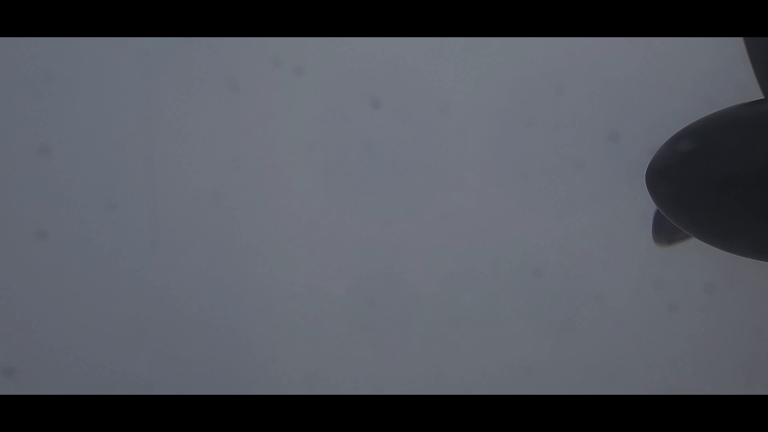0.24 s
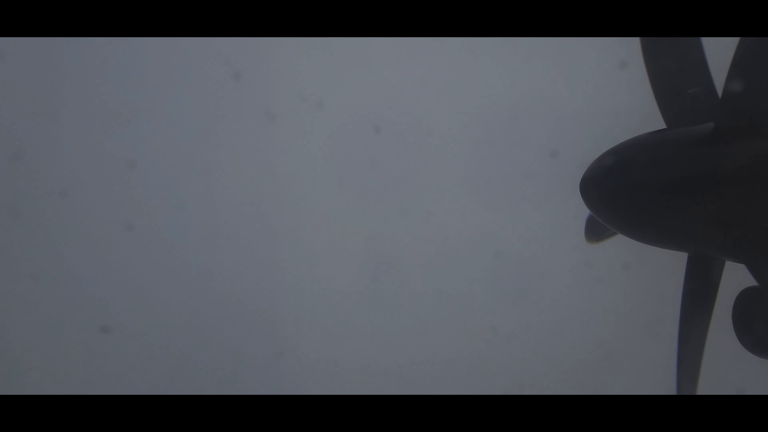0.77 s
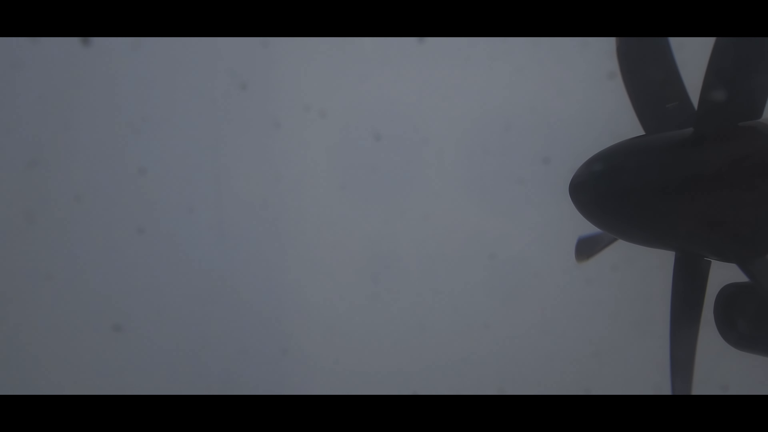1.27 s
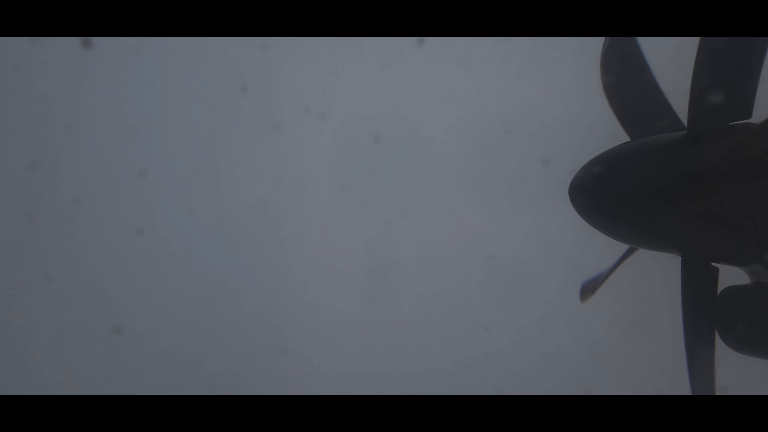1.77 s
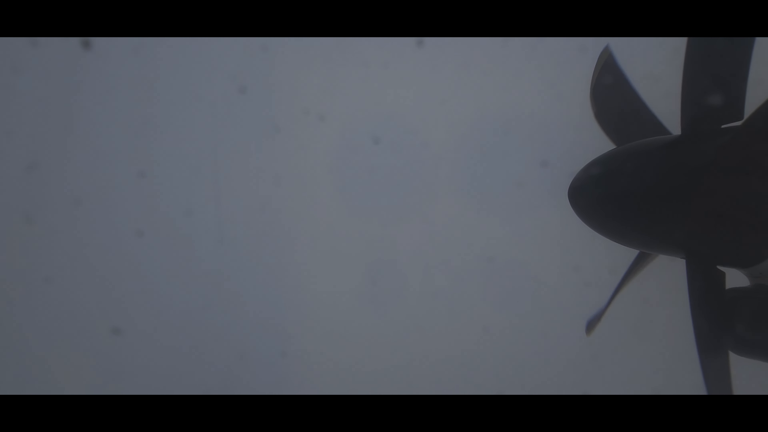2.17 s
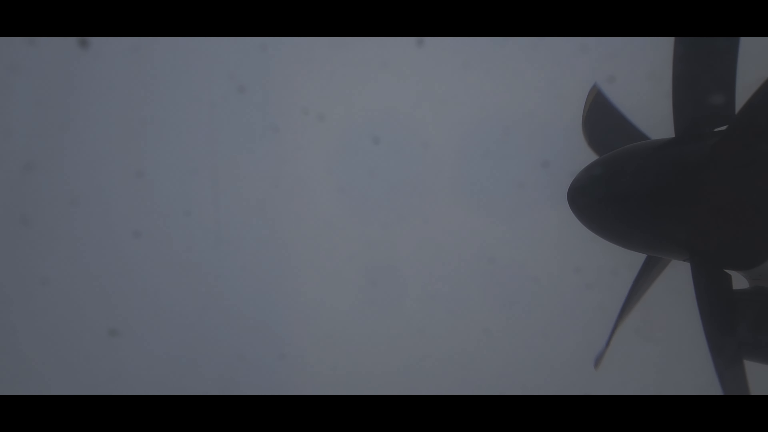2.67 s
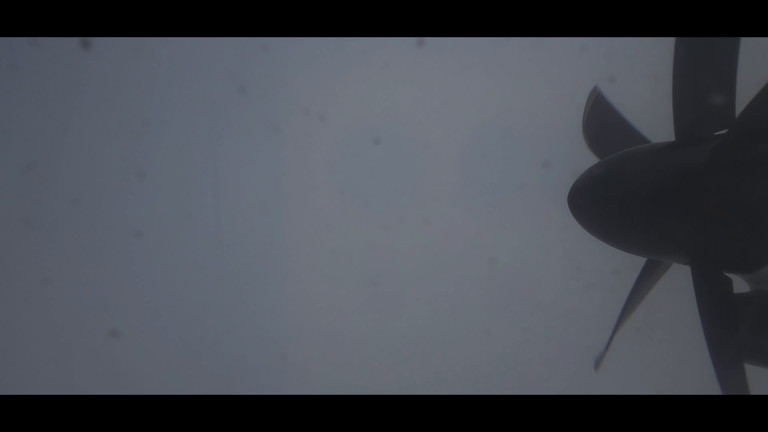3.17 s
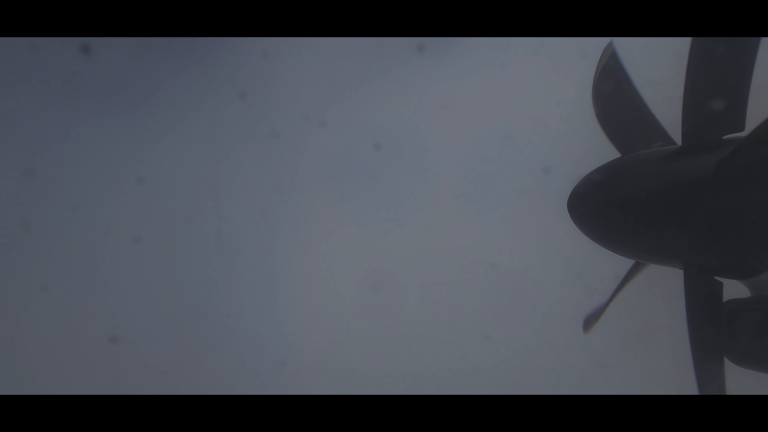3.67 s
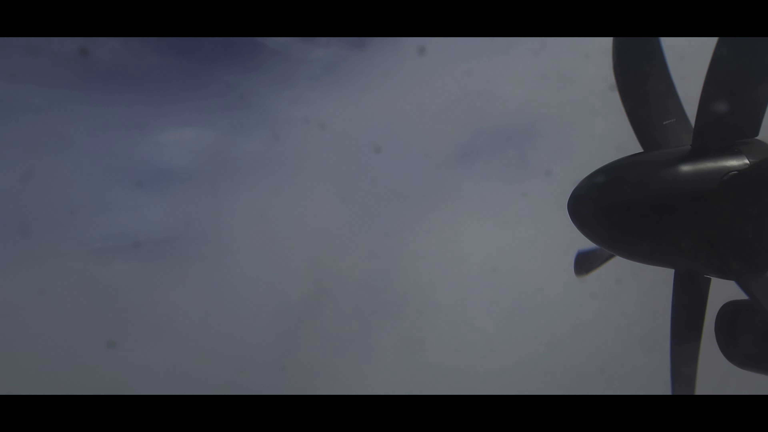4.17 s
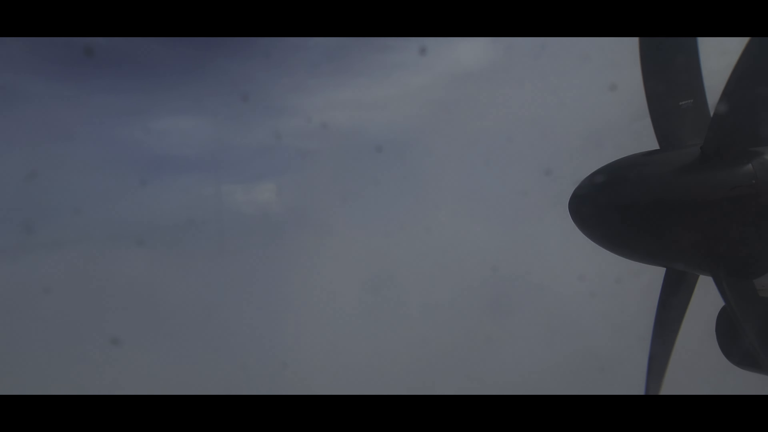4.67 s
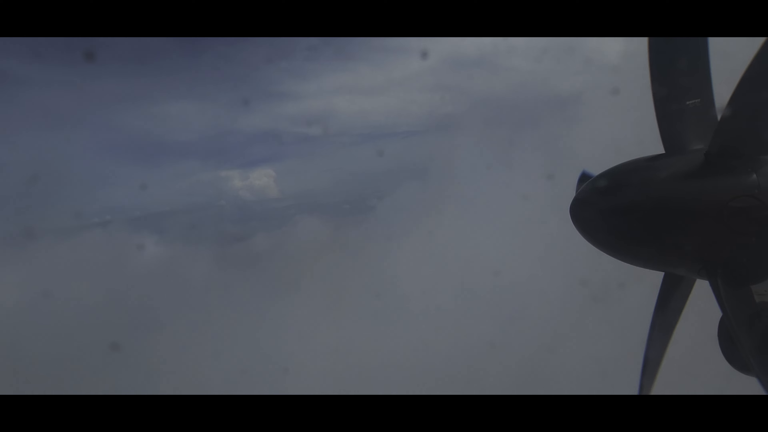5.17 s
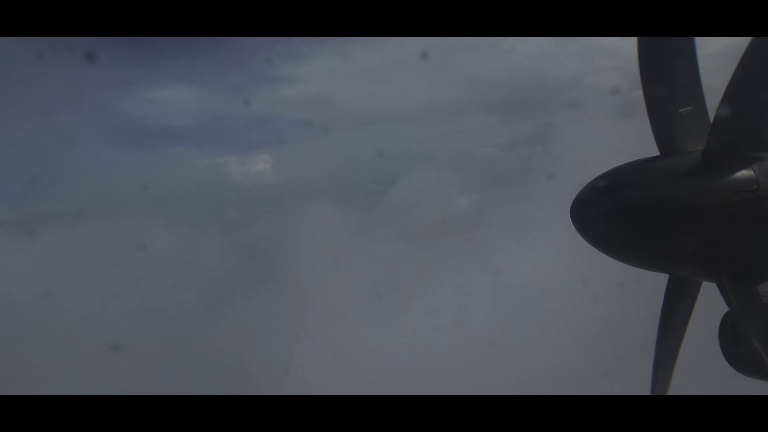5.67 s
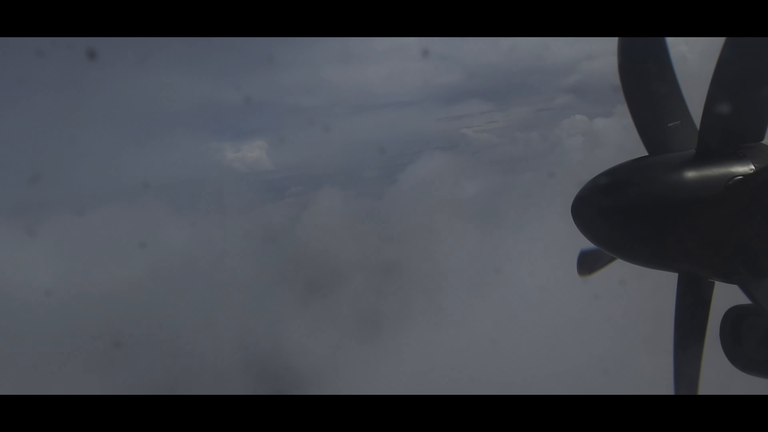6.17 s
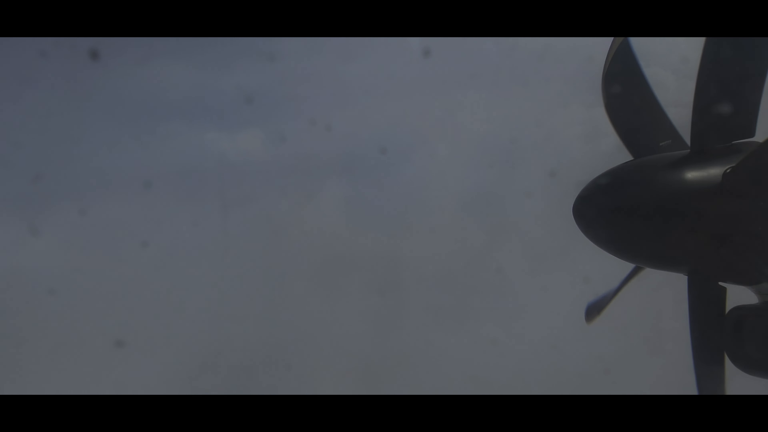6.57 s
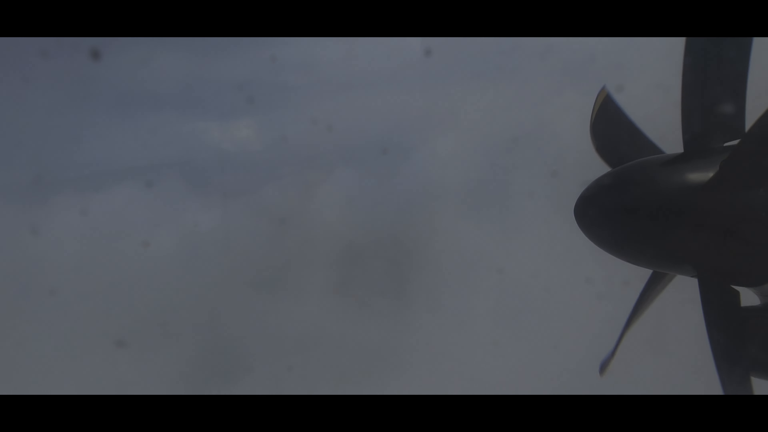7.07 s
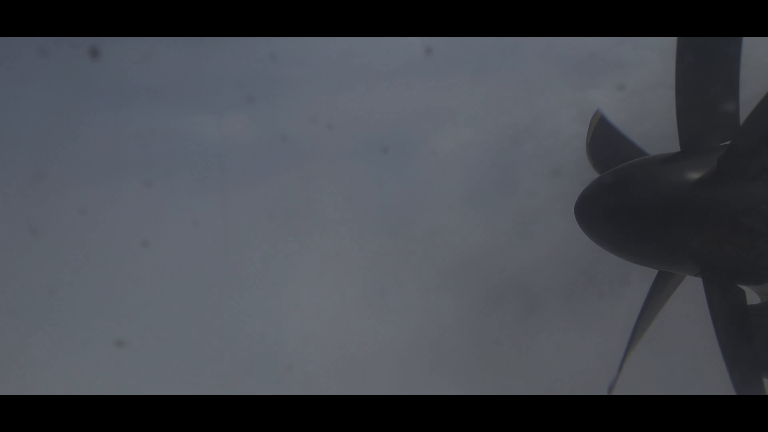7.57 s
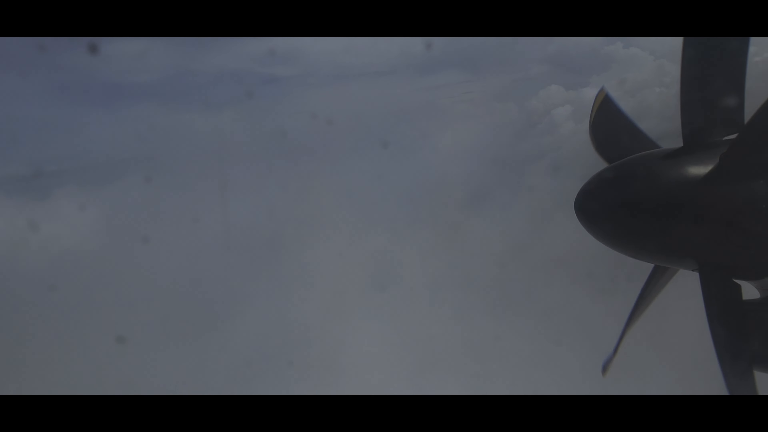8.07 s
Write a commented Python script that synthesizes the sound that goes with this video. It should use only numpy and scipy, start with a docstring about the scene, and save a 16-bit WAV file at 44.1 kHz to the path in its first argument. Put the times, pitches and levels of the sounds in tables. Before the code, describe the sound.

A deep, steady propeller drone fills a small aircraft cabin, slowly swelling and sinking as two propellers drift in and out of step. Airframe rumble and air hiss run throughout. A loose trim panel buzzes in bouts, with dry slaps in the first couple of seconds; the hum thins near three seconds, then returns full. A thin high whine sits on top. Microphone close by at a window seat, in stereo.

```python
"""A deep blade-pass hum swells and sinks in a turboprop cabin, over a rumbling, roaring airframe.
Two six-bladed propellers make it: each harmonic is a pair of tones that add or cancel as their lag drifts.
Airframe rumble and roar are shaped noise, the roar pulsing with the blades; shaped noise also hisses steadily.
A loose trim panel buzzes and rings once per blade pass, harder in bouts, with a few sharp slaps.
A thin turbine whine of unsteady tones sits on top."""
import sys
import numpy as np
from scipy import signal
from scipy.fft import rfft, irfft, next_fast_len
from scipy.io import wavfile
from scipy.ndimage import map_coordinates

SR = 44100
rng = np.random.default_rng(int(sys.argv[2]) if len(sys.argv) > 2 else 0)


def to_wav(sig):
    """Store sig (one row per channel, or 1-D mono) as 16-bit WAV at the path in sys.argv[1].

    Samples outside -1..1 are clipped; the rate is SR.
    """
    pcm = np.clip(np.atleast_2d(sig), -1, 1) * 32767
    pcm = np.round(pcm).astype(np.int16)
    wavfile.write(sys.argv[1], SR, pcm.T)  # frames by channels


N = 367345  # length in samples

# Blades passing the window. Each row: time in seconds, rate in Hz.
BLADE_RATE = [(0, 90.05), (0.8, 90.5), (1.4, 89.94), (1.9, 90.23), (2.4, 90.25), (2.9, 90.1), (3.4, 89.9),
              (3.9, 89.8), (4.4, 89.85), (4.9, 89.66), (5.4, 90.65), (5.9, 90.66), (6.5, 90.52),
              (7.1, 90.34), (7.7, 90.17), (8.33, 89.57)]
# How far the other propeller trails the near one. Each row: time in seconds, lag in blade passes.
PROPELLER_LAG = [(0, 0.074), (.95, 0.12), (1.5, 0.11), (2, 0.081), (2.6, 0.17), (3, 0.31), (3.25, 0.39),
                 (3.6, 0.3), (4, 0.14), (4.33, 0.0098), (4.7, 0.098), (5.1, 0.14), (5.55, 0.206),
                 (6.2, 0.17), (6.7, 0.047), (7.2, 0.19), (7.7, 0.29), (8.33, 0.25)]
# Blade-pass harmonics from the first up, before balance and loading. Each row: near propeller in dB,
# other propeller's share (0-1), lag at which the two add up in blade passes, left-right phase in rad,
# flutter depth (0-1).
HARMONICS = [(-21, 1, 0.0041, 0.1, 0), (-29.5, 0.48, .28, 0.32, .04), (-29.5, 0.41, 0.269, 0.4, 0.06),
             (-30, 0.07, 0.25, 0.25, 0.16), (-44, 0.07, 0.113, 1.66, 0.37), (-47, 0.59, 0.144, -1, 0.4),
             (-52, 0.4, 0.127, 1.3, 0.37), (-52, 0.26, 0.082, 2.2, 0.2), (-49.5, 0.9, 0.014, 2.6, 0.26),
             (-62, .4, 0.076, 2.7, 0.3)]
# Gain on the thin harmonics. Each row: time in seconds, fifth in dB, sixth in dB, seventh and above in dB.
OVERTONE_GAIN = [(0, -7, -4, -2), (1.1, -2, -2.5, -1), (1.8, -8, -2, -1), (2.7, -4, -1.5, -3),
                 (4, -2, 2.5, 1), (4.8, 4, 2, 1), (5.3, -6, -2, 3), (5.6, -1, -0.5, 8), (6.5, 0, 1.5, -1),
                 (7.4, -1.5, -2, 0), (8.33, 2, 0, 1)]
# Turbulent flow on the airframe, before trim. Each row: time in seconds, rumble in dB, roar in dB.
FLOW = [(0, -34, -34), (0.5, -34.5, -36), (1, -34.5, -35), (1.9, -35.5, -35.5), (2.7, -34, -35.5),
        (3, -33, -36), (3.25, -24.5, -32.5), (3.55, -31.5, -33), (4.1, -31.5, -33), (4.9, -34.5, -35.5),
        (5.5, -32, -35.5), (6.4, -32.5, -36), (7.3, -33.5, -34), (7.8, -29.5, -35.5), (8.33, -32, -32)]

# Noise colours, only their shape matters. Each row: frequency in Hz, relative density in dB per Hz.
RUMBLE_COLOUR = [(18, -35), (41, -10), (46, -2), (54, 1.5), (63, -1), (72, -0.5), (85, -3.5), (115, -6),
                 (150, -8), (195, -12.5), (235, -6.5), (290, -7.5), (340, -26.5), (420, -20.5),
                 (700, -53.5)]
ROAR_COLOUR = [(120, -14), (260, 4), (400, 2), (445, -7), (520, -4), (610, -8), (740, -10), (820, -7),
               (950, -18), (1250, -16), (1600, -22), (2500, -27), (5000, -72)]
HISS_LEFT_COLOUR = [(900, -6), (2000, -13.5), (2600, -17.5), (3000, -7), (4100, -13), (5600, -6),
                    (7000, -8), (7700, 1.5), (8200, -5.5), (9600, -6.5), (10700, -23), (11500, -13),
                    (14000, -16.5), (15500, -15)]
HISS_RIGHT_COLOUR = [(900, -30), (2000, -10.5), (2600, -14), (3100, -8), (4100, -8), (6200, -6.5),
                     (7100, -11), (7700, -18), (8300, -13), (9300, -16), (10700, -13.5), (11500, -13.5),
                     (12500, -22), (15500, -27)]
BUZZ_COLOUR = [(300, -5), (600, 10), (950, 1), (1500, -2), (1900, -10), (2600, -5.5), (3000, -1),
               (4300, -1), (6400, 1.5), (8000, -4.5), (10000, -5), (12400, -4.5), (14200, -10.5),
               (15500, -6)]
# Stereo width of the airframe noise. Each row: frequency in Hz, left-right likeness (0-1).
LIKENESS = [(40, 0.9), (130, 0.92), (260, 0.18), (400, 0.9), (520, 0.83), (700, 0), (1200, 0.28), (3000, 0)]

# Turbine whine and its sidebands a blade rate apart. Each row: frequency in Hz, level in dB before trim.
WHINE = [(7307, -61), (7487, -67), (7578, -60), (7668, -53), (7758, -56), (7848, -61), (7938, -64),
         (8028, -66), (8119, -67), (8570, -65)]
# The panel's hardest slaps. Each row: time in seconds, burst level in dB before colouring.
SLAPS = [(0.6793, -24), (0.6994, -33), (0.711, -24), (0.8454, -28), (0.899, -27), (1.6192, -30),
         (1.708, -29), (1.8297, -29), (1.886, -27), (1.94, -27), (2.2297, -27), (2.2976, -29)]
# The panel's ringing modes. Each row: frequency in Hz, relative level in dB, time to fall 60 dB in seconds.
PANEL_MODES = [(765, 3, 0.06), (1020, 12, 0.022), (1120, -6.5, 0.012), (1370, 5, 0.016), (1430, -3, 0.028)]
# Bouts of harder buzzing, before trim. Each row: start in seconds, length in seconds, rise in seconds,
# buzz in dB, hollow ring in dB.
BOUTS = [(0, 0.66, 0.092, -42, -55.5), (0.648, 0.074, .03, -35.5, -48), (0.812, 0.11, 0.036, -36.5, -64),
         (.95, 0.55, 0.038, -47, -59), (1.54, 0.15, .06, -40, -71), (1.872, 0.048, .02, -37, -65),
         (2.16, 0.19, 0.044, -40.5, -58), (3.183, 1.78, 0.74, -37.5, -49.5), (4.95, .27, 0.049, -40, -49.5),
         (5.41, .3, 0.048, -49, -53.5), (5.962, 0.84, 0.022, -37, -48), (6.878, 0.86, .06, -47, -56)]
# Peaks and hollows of the microphone ports. Each row: frequency in Hz, width in Hz, gain in dB.
PORTS = [(2590, 56, -8), (4310, 150, 2), (4735, 310, 3), (5120, 120, -1), (5460, 86, 3.5),
         (10750, 230, -7.5), (11500, 170, -1), (12100, 210, -7), (12550, 130, 2.5), (13600, 240, -10),
         (13900, 170, 0), (15400, 220, -15)]

BLADES = 6
GUST_LOADING = 0.2  # dB that the second to fourth harmonics gain per dB of rumble, as gusts load the blades
IDLE_BUZZ_DB, IDLE_RING_DB = -44.5, -60.5  # the panel between bouts, before trim
RELEASE_S = 0.02  # decay time constant of a bout
TOP_HZ, EDGE_S = 15650, 0.006  # band limit; fade at each end


def amp(db):
    """Decibels to gain."""
    return 10 ** (np.asarray(db) / 20)


def unit(x):
    """Scaled to rms 1."""
    return x / np.sqrt(np.mean(x ** 2) + 1e-20)


def along(points, hz):
    """(Hz, value) points read on a log frequency axis."""
    f, v = np.transpose(points)
    return np.interp(np.log(hz + 1), np.log(f + 1), v)


def curves(rows):
    """One value per sample for each column after the time."""
    s, *cols = np.transpose(rows)
    return [np.interp(np.arange(N) / SR, s, c) for c in cols]


def wobble(rate):
    """A smooth random curve with rate knots a second."""
    t = np.arange(N) / SR
    coarse = t[::64]
    knots = rng.standard_normal(1024)
    return np.interp(t, coarse, map_coordinates(knots, [coarse * rate], mode="mirror"))


def filtered(x, response):
    """x times a response of frequency, padded against wrap-around."""
    m = next_fast_len(N + SR // 2)
    return irfft(rfft(x, m) * response(np.fft.rfftfreq(m, 1 / SR)), m)[..., :N]


def coloured(x, spectrum):
    """x shaped by (Hz, dB) points."""
    return filtered(x, lambda hz: amp(along(spectrum, hz)))


def lean(left_db):
    """Gains that make the left channel louder by left_db."""
    return amp(left_db * np.array([[0.5], [-0.5]]))


def rush(spectrum):
    """Stereo noise of rms 1, its left-right likeness set per frequency by a mid-side balance."""
    def mid_side(hz):
        turn = np.arccos(np.clip(along(LIKENESS, hz), -1, 1)) / 2
        return amp(along(spectrum, hz)) * [np.cos(turn), np.sin(turn)]

    mid, side = filtered(rng.standard_normal((2, N)), mid_side)
    return unit(np.array([mid + side, mid - side]))


def tone(phase, spread, flutter, rate, order=1):
    """A stereo harmonic, rms 1 before flutter shakes its size and phase; spread is left-right phase."""
    shaken = 1 + flutter * (wobble(rate) + 1j * wobble(rate))
    ear_phase = spread * np.array([[0.5], [-0.5]])
    return np.sqrt(2) * np.real(shaken * np.exp(1j * (order * phase + ear_phase)))


def air():
    """Steady hiss of cabin air: independent noise in each ear, fuller on the left."""
    left, right = rng.standard_normal((2, N))
    hiss = np.array([coloured(left, HISS_LEFT_COLOUR), coloured(right, HISS_RIGHT_COLOUR)])
    return amp(-40.0) * unit(hiss)


def turbine():
    """Thin, slightly unsteady lines of the engine's whine."""
    turn = 2 * np.pi * np.arange(N) / SR
    lines = sum(amp(db) * tone(hz * turn, spread=0.6, flutter=0.45, rate=16) for hz, db in WHINE)
    return amp(-4.0) * lines * lean(3)


def airframe(passes):
    """Turbulence rumbles in the fuselage; the roar of the propeller wash pulses with the blades."""
    rumble_db, roar_db = curves(FLOW)
    rumble = amp(rumble_db + 5.0) * rush(RUMBLE_COLOUR)
    wash = 1 + 0.092 * np.cos(2 * np.pi * passes)
    return rumble + amp(roar_db + 1.26) * wash * rush(ROAR_COLOUR)


def contacts(passes, scatter_db, jitter_s):
    """One blow per blade pass, uneven in size and timing."""
    hits = np.flatnonzero(np.diff(np.floor(passes)))
    timing, size = rng.standard_normal((len(hits), 2)).T
    hits = np.clip(hits + np.round(jitter_s * SR * timing).astype(int), 0, N - 1)
    return np.bincount(hits, amp(scatter_db * size), N)


def chatter(blows, level_db, spectrum, decay, rise, rebound):
    """Each blow is a burst of noisy micro-impacts, with a weak rebound about half a cycle later."""
    t = np.arange(SR // 40) / SR
    burst = lambda u: np.exp(-u / decay) * (1 - np.exp(-u / rise))
    contact = burst(t) + rebound * burst(np.maximum(t - 0.006, 0))
    force = unit(signal.fftconvolve(blows, contact)[:N])
    return amp(level_db) * unit(coloured(force * rng.standard_normal((2, N)), spectrum))


def hollow(blows, swish_db=-5, ear_lag_s=0.00039):
    """Every blow rings the same modes, so lines a blade rate apart stand over a soft swish."""
    t = np.arange(SR // 20) / SR
    arrival = np.maximum(t - np.array([[0], [ear_lag_s]]), 0)  # the left ear is nearer
    response = 0
    for k, (hz, db, t60) in enumerate(PANEL_MODES):
        decay = amp(db - 60 * arrival / t60)
        response = response + (-1) ** k * decay * np.sin(2 * np.pi * hz * arrival)  # alternating polarity
    response = response * (1 - np.exp(-arrival / 0.0012))  # soft onset
    ring = unit(signal.fftconvolve(blows[None], response, axes=1)[:, :N])
    swish_colour = [(500, -30), (1000, -31), (1170, 3.5), (1400, 0.5), (1560, -34), (2200, -49)]
    swish = chatter(blows, swish_db, swish_colour, decay=0.0022, rise=0.00081, rebound=0.14)
    return unit(ring + swish)


def bouts(waver_db=1.03, waver_rate=12):
    """Gains of the panel's buzz and ring: each bout rises, holds unsteadily and dies away."""
    t = np.arange(N) / SR
    power = amp([[IDLE_BUZZ_DB], [IDLE_RING_DB]]) ** 2
    for start, length, rise, buzz_db, ring_db in BOUTS:
        attack = np.clip((t - start) / rise, 0, 1)
        release = np.exp(-np.maximum(t - start - length, 0) / RELEASE_S)
        power = power + (amp([[buzz_db], [ring_db]]) * attack * release) ** 2
    return np.sqrt(power) * amp(waver_db * wobble(waver_rate))


def panel(passes, buzz_trim_db=-0.5, ring_trim_db=6.5):
    """The hum throws a loose panel against its frame once a cycle: a dry buzz over a longer hollow ring."""
    blows = contacts(passes, scatter_db=1.4, jitter_s=0.00005)
    buzz_gain, ring_gain = bouts()
    buzz = chatter(blows, buzz_trim_db, BUZZ_COLOUR, decay=0.0025, rise=0.0014, rebound=0.26)
    return buzz_gain * buzz + ring_gain * amp(ring_trim_db) * hollow(blows)


def slaps(decay_s=0.00097):
    """The panel's hardest contacts: decaying noise bursts, shorter and brighter than its buzz."""
    t = np.arange(SR // 50) / SR
    bursts = np.zeros(N)
    for s, db in SLAPS:
        bursts[round(s * SR):][:len(t)] += amp(db) * np.exp(-t / decay_s)
    colour = [(800, -15), (2500, 3), (4500, 5.0), (12000, 6.0), (15500, -13)]
    return coloured(bursts * rng.standard_normal((2, N)), colour)


def blade_passes():
    """Running count of blades that have passed the window."""
    return np.cumsum(curves(BLADE_RATE)[0]) / SR


def propeller_pair(passes, order, flutter_rate):
    """One harmonic of both propellers: they add or cancel as the lag between them drifts."""
    db, share, in_step, spread, flutter = HARMONICS[order - 1]
    trailing = passes - curves(PROPELLER_LAG)[0] + in_step
    near = tone(2 * np.pi * passes, spread, flutter, flutter_rate, order=order)
    far = tone(2 * np.pi * trailing, spread, flutter, flutter_rate, order=order)
    return amp(db) * (near + share * far)


def overtones(passes):
    """The thin upper harmonics beat faster, waver in the turbulence and reach each ear with their own phase."""
    fifth_db, sixth_db, higher_db = curves(OVERTONE_GAIN)
    line = lambda order: propeller_pair(passes, order, flutter_rate=7)
    higher = sum(line(k) for k in range(7, len(HARMONICS) + 1))
    return amp(fifth_db) * line(5) + amp(sixth_db) * line(6) + amp(higher_db) * higher


def propellers(passes):
    """The four strong harmonics through the cabin wall; unequal blades add shaft-rate sidebands to the first."""
    uneven = 1 + 0.0086 * np.cos(2 * np.pi * passes / BLADES)
    hum = uneven * propeller_pair(passes, order=1, flutter_rate=48)
    rumble_db = curves(FLOW)[0]
    loading = amp(GUST_LOADING * (rumble_db - rumble_db.mean()))
    second, third, fourth = [propeller_pair(passes, order=k, flutter_rate=12) for k in range(2, 5)]
    upper = loading * (second - third + fourth)  # the wall's modes pass the third harmonic upside down
    return hum * lean(0.31) + upper * lean(1.7)


def scene():
    """Everything heard from the window seat."""
    passes = blade_passes()
    background = air() + turbine() + airframe(passes)
    loose_panel = panel(passes) + slaps()
    return background + loose_panel + overtones(passes) + propellers(passes)


def record(dry):
    """Microphone ports colour the treble, nothing passes above the band limit, and both ends are eased."""
    def ports(f):
        return amp(sum(db * np.exp(-((f - hz) / width) ** 2) for hz, width, db in PORTS))

    t = np.arange(N) / SR
    to_edge = np.minimum(t, t[::-1])
    eased = dry * np.sin(np.pi / 2 * np.clip(to_edge / EDGE_S, 0, 1))
    return filtered(eased, lambda hz: ports(hz) * (hz < TOP_HZ))


dry = scene()
out = record(dry)
to_wav(out)
```